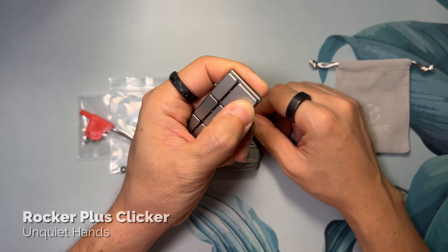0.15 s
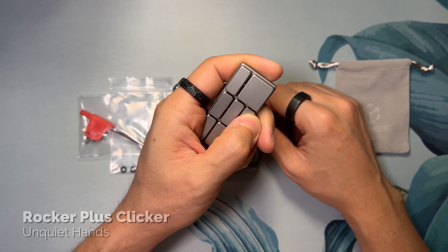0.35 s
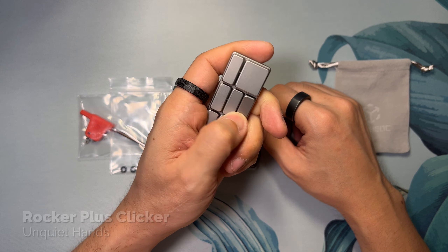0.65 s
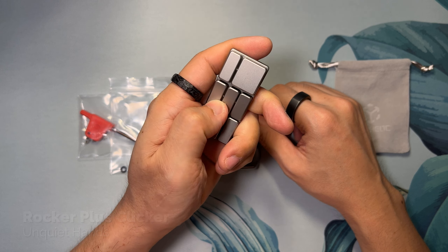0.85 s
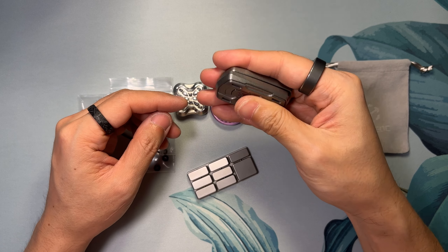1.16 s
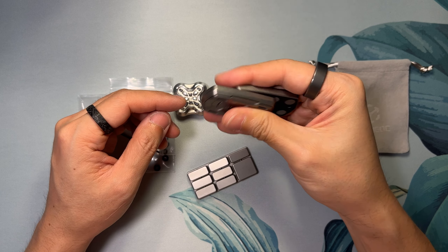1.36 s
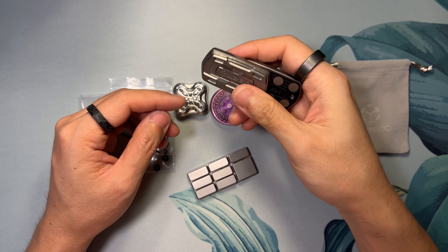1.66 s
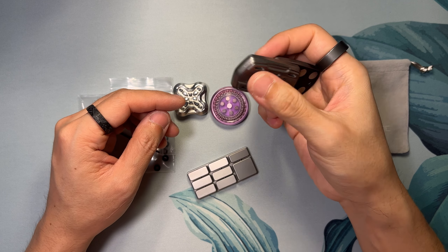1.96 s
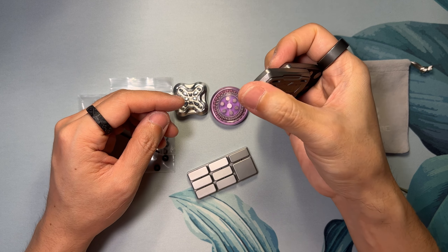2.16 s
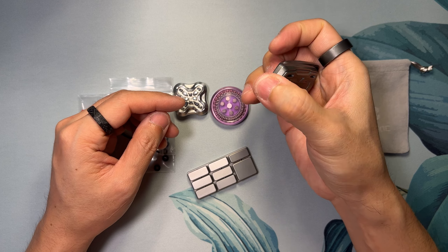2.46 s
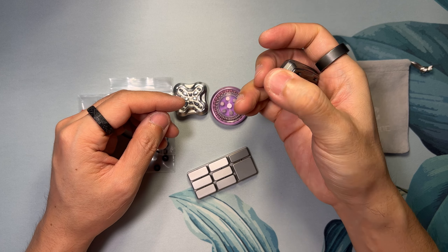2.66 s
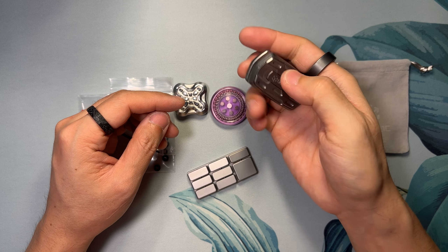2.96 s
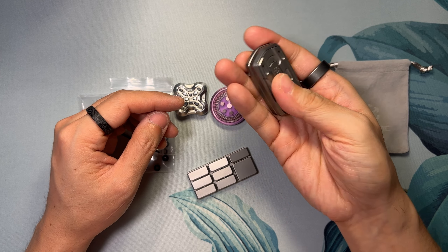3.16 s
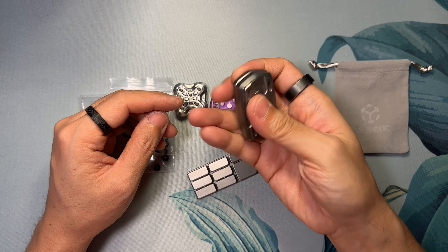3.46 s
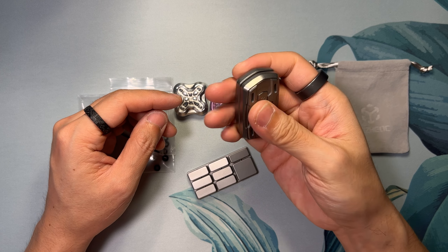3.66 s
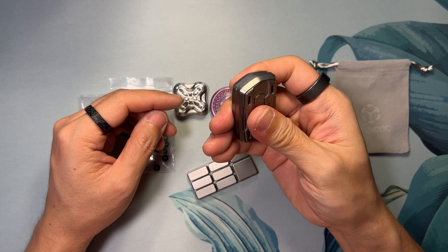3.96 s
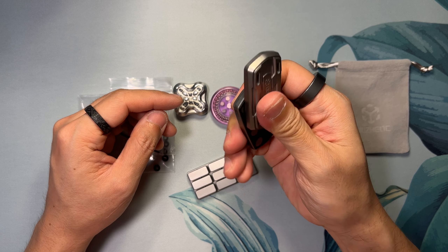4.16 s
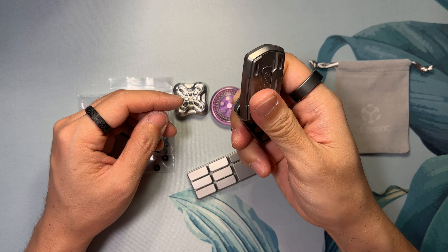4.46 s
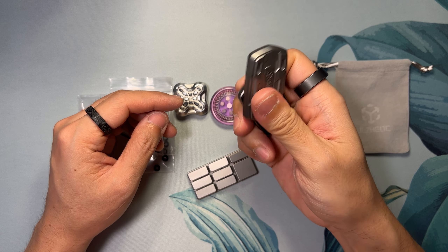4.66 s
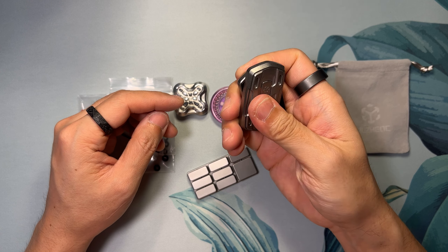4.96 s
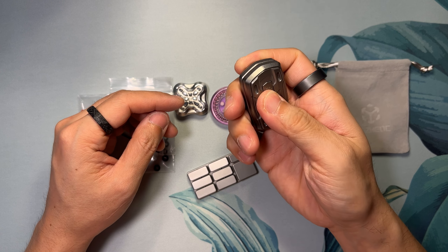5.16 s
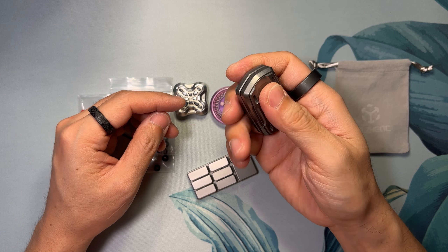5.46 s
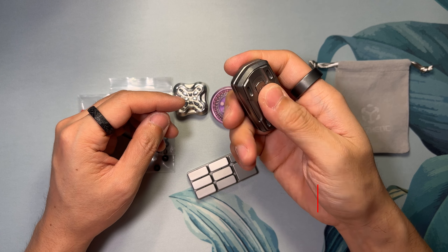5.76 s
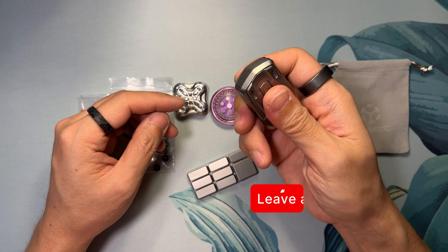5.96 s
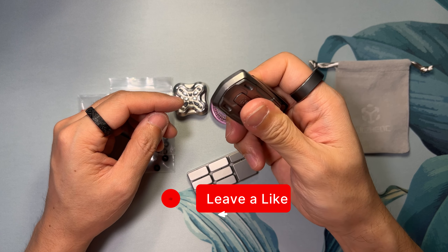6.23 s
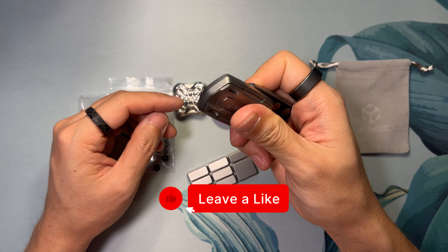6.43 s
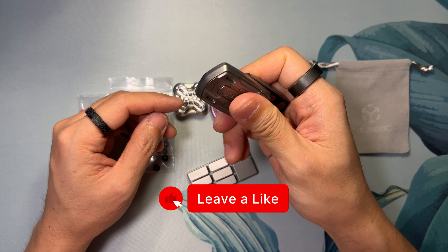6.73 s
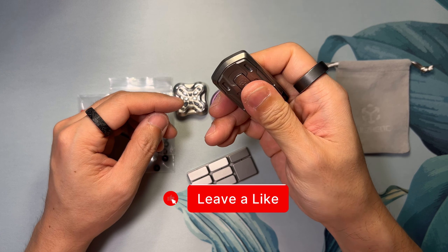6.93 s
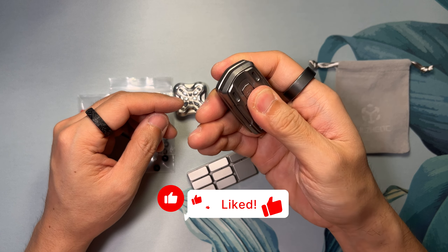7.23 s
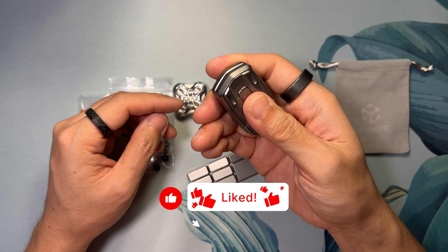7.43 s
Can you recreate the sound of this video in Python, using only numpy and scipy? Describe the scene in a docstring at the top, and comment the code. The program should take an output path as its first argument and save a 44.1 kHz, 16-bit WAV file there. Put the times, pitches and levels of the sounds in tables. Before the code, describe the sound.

Two hand-held metal fidget toys are worked over a desk, recorded very close. Three dry, piercing magnetic clicks open, evenly spaced. Then a rocker lever scrapes and snaps in uneven bursts, interrupted by a louder, fuller double clack of its folding arm. Later come a dense cluster of ticks and snaps, a quiet gap, and four spaced, loud snaps. Small-room reflections, thin metallic ring, soft skin rub and very faint deep hum.

```python
"""A small room, with two metal fidget toys clicked close to a microphone over a desk.
A magnetic slider slams from stop to stop; then a rocker's lever catches, scrapes and snaps home,
and once its folding arm clacks open and shut. Each blow is shaped noise sent through the metal's resonances.
The desk and walls throw each click back, and thin metal rings on as dying sines.
Behind them are skin rubbing on metal, air noise, wavering hum tones and a deep throb."""
import sys
import numpy as np
from scipy import signal
from scipy.fft import rfft, irfft
from scipy.io import wavfile
from scipy.ndimage import uniform_filter1d, minimum_filter1d

SR = 44100
rng = np.random.default_rng(int(sys.argv[2]) if len(sys.argv) > 2 else 0)


def wav_record(signal):
    """Record a signal, one row per channel, as 16-bit PCM in the file named by sys.argv[1]."""
    frames = np.transpose(np.atleast_2d(signal))
    bounded = np.clip(frames, -1, 1)
    # unit amplitude maps onto the largest positive 16-bit level
    quanta = np.round(bounded * 32767).astype(np.int16)
    wavfile.write(sys.argv[1], SR, quanta)


N = 334719  # length of the scene in samples
SIZE = 4096  # length of one blow and of its spectrum, in samples
HZ = np.fft.rfftfreq(SIZE, 1 / SR)

# shared by snaps and ticks: half width of the low knock, and scrape level against the peak of the snap
KNOCK_WIDTH_HZ, SCRAPE_DB = 280, -20


def rocker(start_s):
    """The lever snaps, ticks in its play and once slams into the frame; its spring pings."""
    # the lever snaps over; the row at 2.917 is the dull low knock of the arm settling:
    # (time [s], level [dB], chatter [s], scrape before the snap [s],
    # grip [0 loose to 1 tight], brightness [dB], low knock [Hz], low knock [dB])
    snaps = [(1.254, 10.5, .0065, .009, .1, 1, 1540, 7), (1.359, 12.5, .005, .012, .6, -1.5, 1780, 7.5),
             (2.917, -21, .004, .001, 0, -17, 2720, 24), (4.053, 13, .005, .0085, .1, .5, 1600, 7.5),
             (4.2967, 7, .0025, .004, .85, -8, 1950, 6), (4.652, 3.5, .003, .012, .7, -.5, 1600, 11),
             (4.793, -5, .0012, .007, .2, -1, 1400, 10), (6.054, 12.5, .0045, .0075, .1, .5, 2000, 8.5),
             (6.368, 10.5, .0045, .012, .1, .5, 2350, 6), (6.773, 12, .004, .006, .3, -2.5, 1750, 6),
             (7.0835, 16.5, .0045, .004, .15, -1.5, 2400, 4.5)]
    # once the lever slams right into the frame: one row with the same columns as the snaps
    slam = (5.0617, 13.5, .0021, .005, 0, -1, 2300, 8)
    # frame resonances that the slam wakes: (centre [Hz], half width [Hz], lift [dB])
    frame = [(2354, 200, 10.5), (4900, 650, 10)]
    # light ticks of the lever in its play:
    # (time [s], level [dB], chatter [s], grip [0-1], brightness [dB])
    ticks = [(.998, -26, .003, 0, -8), (1.508, -6.5, .002, .55, -11), (2.233, -21, .0055, .75, 2.5),
             (3.904, -14, .006, .3, 1), (4.118, -2, .004, .8, -1), (4.1353, 3, .0075, .8, -4),
             (4.215, -3, .0035, .3, -1.5), (4.279, -15.5, .0048, .3, 2), (4.917, -12.5, .003, .3, 0),
             (4.961, -.5, .003, .35, -5), (4.977, 1, .0015, 0, 5.5), (4.983, -6, .001, .2, 5),
             (5.043, 2.5, .0016, .15, 5), (6.998, -19, .007, .4, 2), (7.557, -33, .003, 0, -7)]
    # the spring pings as the lever is cocked: (pitch [Hz], level [dB], t60 [s])
    ping = (5699, -62, 0.49)
    ping_s = 3.906
    tick_travel_s = .003  # a tick has almost no travel
    tick_knock_hz, tick_knock_db = 2150, 4  # all ticks share one low knock

    out = np.zeros(N + SR)
    for row in snaps:
        s, sound = snap(*row)
        add(out, start_s + s, sound)

    frame_db = sum(bump(*mode) for mode in frame)
    s, sound = snap(*slam, frame_db)
    add(out, start_s + s, sound)

    for s, db, chatter_s, grip, bright_db in ticks:
        level_db = db + bump(tick_knock_hz, KNOCK_WIDTH_HZ, tick_knock_db)
        colour = held(grip, bright_db) * gain_of(level_db)
        tick = strike(catch(chatter_s, tick_travel_s, SCRAPE_DB), colour)
        add(out, start_s + s - tick_travel_s, room(tick, wet_db=0.8))
        add(out, start_s + s, ring(colour))

    add(out, start_s + ping_s, tone(*ping))
    return out


def snap(s, db, chatter_s, travel_s, grip, bright_db, knock_hz, knock_db, frame_db=0):
    """A soft swelling rustle leads into the scrape and the snap; returns start time and sound."""
    # rustle and scrape together take about the same time; what the travel leaves of it is a quiet swell
    lead_s, shortest_rustle_s = .012, .001
    rustle_s = max(lead_s - travel_s, shortest_rustle_s)

    # the low knock is one resonance of the struck spot
    level_db = db + bump(knock_hz, KNOCK_WIDTH_HZ, knock_db) + frame_db
    colour = held(grip, bright_db) * gain_of(level_db)

    rustle = catch(chatter_s=.0013, scrape_s=rustle_s, scrape_db=-50, swell_s=.25 * rustle_s)
    force = gain_of(-10.5) * rustle  # level against the snap
    add(force, rustle_s, catch(chatter_s, travel_s, SCRAPE_DB))

    out = np.zeros(SR)
    add(out, 0, room(strike(force, colour), wet_db=1.0))
    add(out, rustle_s + travel_s, ring(colour))
    return s - travel_s - rustle_s, out


def held(grip, bright_db):
    """Gain of the shell in the hand: a tight grip damps its low resonances and leaves the lever singing."""
    # the rocker's shell, damped by the hand: (centre [Hz], half width [Hz], level [dB])
    shell = [(1577, 350, -5.5), (1905, 359.0, -6.0), (2440, 354.0, -12.5), (3030, 400, -9.0),
             (4260, 570, -11), (5360, 370, -11), (5800, 566.0, -8), (7091.0, 642.0, 1.5), (8040, 940, 0.5),
             (8983, 640, 1.0), (10340, 610, -4), (11526.0, 570, -10.5), (13770, 994.0, 0.5),
             (15200, 760, -1.5)]
    # the fingers damp the shell below the lever's own pitch, held loosely and tightly:
    # (frequency [Hz], gain [dB])
    loose = [(1100, 1.5), (1700, -2), (3500, 2), (5250, 3), (8100, 0)]
    tight = [(1700, -12), (3500, -5), (5250, -1), (8100, 0)]

    damping = (1 - grip) * read(loose, HZ) + grip * read(tight, HZ)
    # a harder contact lifts the treble
    treble = np.interp(HZ, [8130, 12000], [0, bright_db])
    lever = bump(hz=8930, width_hz=380, db=grip ** 2 * 11)
    return body(shell, tick_db=-45, low_hz=695) * gain_of(damping + treble + lever)


def arm(start_s):
    """The rocker's folding arm hits its end stops and rings the whole toy."""
    # the arm swings out, then shuts, rebounds and settles: (time [s], level [dB], chatter [s],
    # scrape before it [s], scrape level [dB], position [0 open or 1 shut])
    swings = [(2.3582, 22.5, 0.0086, 0.01, -29.5, 0), (2.665, 19, 0.0017, 0.0055, -23, 1),
              (2.6805, 14.5, 0.016, .002, -9.5, 1), (2.917, -19, .004, .001, -20, 1)]
    # the rocker's resonances with the arm open and shut: (centre [Hz], half width [Hz], level [dB])
    arm_open = [(1550, 150, 1.5), (2100, 400, -5), (3300, 500, -2.5), (4340, 450, -2), (5220, 400, -1),
                (6150, 400, -4), (7050, 400, 1), (8500, 450, 2.5), (10300, 900, -12), (13200, 300, -6),
                (14200, 500, -5.5), (15300, 400, -10)]
    arm_shut = [(1650, 300, -1.5), (2200, 310, -3), (3270, 300, 4.5), (4500, 350, 2), (5680, 600, 0),
                (7030, 240, 4.5), (7696, 300, 3.5), (8530, 540, -5), (11000, 1200, -11),
                (14000, 1200, -5.5)]

    out = np.zeros(N + SR)
    for s, db, chatter_s, scrape_s, scrape_db, shut in swings:
        modes = arm_shut if shut > .5 else arm_open
        colour = gain_of(db) * body(modes, tick_db=-30, low_hz=600)
        clack = strike(catch(chatter_s, scrape_s, scrape_db), colour)
        add(out, start_s + s - scrape_s, room(clack, wet_db=2.2))
        add(out, start_s + s, ring(colour))
    return out


def slider(start_s):
    """Magnets pull the plates into a stop, where they chatter for a millisecond or two."""
    # slider clicks: (time [s], level [dB], chatter [s], stop that the plates land in [0-2])
    slides = [(-.062, 19, 0.0015, 0), (.556, 21, 0.0007, 0), (0.6556, 20, 0.0014, 1),
              (.753, 25.5, 0.0027, 2)]
    # the plates overlap differently in each stop, so each has its own resonances:
    # (centre [Hz], half width [Hz], level [dB])
    first_stop = [(3020, 420, -12.5), (4680, 830, -11.5), (6380, 430, -3.5), (8520, 643.0, 1),
                  (9904.0, 452.0, -2), (10965.0, 340, -4.5), (13570, 780, -2), (15300, 557.0, -13)]
    second_stop = [(3530, 390, -8.5), (5702.0, 622.0, -12), (7548.0, 360, -3), (9300, 382.0, 1.5),
                   (11000, 360, -1.5), (13100, 285.0, -4.5), (14570, 533.0, -7.5), (15544.0, 340.0, -10.0)]
    third_stop = [(3280, 350, -15), (5200, 150, -8), (6200, 380, -12), (8320, 590, -5), (10520, 340, -8),
                  (12180.0, 1500, -14.5), (14100, 350, -8.5), (15130, 716.0, -11.5)]

    out, t = np.zeros(N + SR), np.arange(SIZE) / SR
    for s, db, chatter_s, stop in slides:
        modes = (first_stop, second_stop, third_stop)[int(stop)]
        main_burst = np.exp(-(t / chatter_s) ** 2)
        faint_tail = 0.081 * np.exp(-t / 0.0048)
        force = chatter(main_burst + faint_tail)
        click = gain_of(db) * strike(force, body(modes, tick_db=-34.5, low_hz=904))
        add(out, start_s + s, room(click, wet_db=0))
    return out


def catch(chatter_s, scrape_s, scrape_db, swell_s=.0011):
    """Force of metal that scrapes, swells into a snap and chatters to rest."""
    after = np.arange(SIZE) / SR - scrape_s  # time since the snap
    scrape = np.maximum(gain_of(scrape_db), np.exp(-abs(after) / swell_s))
    rest = np.exp(-(abs(after) / chatter_s) ** 2.4)
    return chatter(np.where(after < 0, scrape, rest))


def chatter(envelope):
    """A rush of tiny metal contacts under an envelope, with energy 1 spread evenly over all pitches."""
    force = rng.standard_normal(SIZE) * envelope
    for _ in range(2):
        z = rfft(force)
        local_power = uniform_filter1d(abs(z) ** 2, size=37)
        force = irfft(z / np.sqrt(local_power + 1e-12))
        # flattening smears the burst, so mute it where the envelope is all but silent
        force = force * np.minimum(100 * envelope, 1)
    return force / np.linalg.norm(force)


def strike(force, gain):
    """Passes a force through the causal minimum-phase filter that has this gain."""
    log_gain = np.log(np.maximum(gain, gain.max() * 1e-4))
    circle = np.r_[log_gain, log_gain[-2:0:-1]]  # positive, then negative frequencies
    spectrum = np.exp(np.conj(signal.hilbert(circle)))  # the log gain sets the phase
    response = np.fft.ifft(spectrum).real[:SIZE // 2]
    return signal.fftconvolve(force, response)


def body(modes, tick_db, low_hz):
    """Gain of broad resonances over a bare tick; a small body radiates little bass."""
    power = sum(gain_of(db) ** 2 / (1 + ((HZ - hz) / width) ** 2) ** 2 for hz, width, db in modes)
    bass_loss = HZ ** 2 / (HZ ** 2 + low_hz ** 2)
    return np.sqrt(power + gain_of(tick_db) ** 2) * bass_loss


def bump(hz, width_hz, db):
    """One resonance as a lift in dB."""
    return db / (1 + ((HZ - hz) / width_hz) ** 2)


def ring(colour):
    """Each free part rings as strongly as the blow is loud at its pitch."""
    # the rocker's free metal parts ring longer: (pitch [Hz], level against the blow [dB], t60 [s])
    parts = [(1514, -63, .1), (2250, -67.5, .25), (3310, -61, .35), (3457, -57, .5), (3504, -57, 0.61),
             (4350, -70.5, .45), (5701, -78, 0.86), (7100, -72, 0.56), (8300, -59.5, .2), (8629, -72.5, .8),
             (9179, -66, .2)]
    return sum(np.interp(hz, HZ, colour) * tone(hz, db, t60) for hz, db, t60 in parts)


def tone(hz, db, t60):
    """One dying mode: a sine that falls 60 dB in t60 seconds."""
    t = np.arange(SR) / SR
    return gain_of(db - 60 * t / t60) * np.sin(2 * np.pi * hz * t)


def room(x, wet_db):
    """Direct sound, near echoes and a dense tail; the hand moves, so every click finds new paths."""
    # early echoes from desk, hands and gear: (nominal delay [s], level [dB])
    echoes = [(.0021, -13), (.0064, -13.5), (.0076, -14.5), (0.0143, -20.5), (0.0152, -20), (.0192, -22),
              (.029, -20)]
    # colour of the tail before the wet level: (frequency [Hz], level [dB])
    tail = [(700, -7), (1500, -13), (2200, -0.5), (4000, -2), (8000, -1.5), (15000, -4)]
    # decay of the tail: (frequency [Hz], t60 [s])
    tail_t60 = [(700, 0.19), (2500, 0.28), (5000, .29), (8000, .28), (11000, 0.27), (15000, .21)]

    t = np.arange(SR // 3) / SR
    hz, when, z = signal.stft(rng.standard_normal(len(t)), SR, nperseg=256)
    t60 = read(tail_t60, hz)[:, None]
    energy_one = np.sqrt(2 * np.log(1000) / (t60 * SR))  # a longer decay carries no more energy
    tail_db = wet_db + read(tail, hz)[:, None] - 60 * when / t60
    z = z * energy_one * gain_of(tail_db)
    build_up = 1 - np.exp(-t / 0.0024)
    response = signal.istft(z, SR, nperseg=256)[1][:len(t)] * build_up
    response[0] = 1  # direct sound
    for delay_s, db in echoes:
        add(response, delay_s * rng.uniform(0.91, 1.04), gain_of([db]))
    return signal.fftconvolve(x, response)


def fingers(centre_hz=6800, width_hz=2600):
    """A soft grainy hiss of skin sliding on metal, once, as the grip shifts."""
    # course of the rub: (start [s], rise [s], hold [s], fall [s])
    rub = (2.85, .45, .08, .25)
    rub_db = -73.5
    grain_db = 2.5 * noise(lambda f: 1 / (1 + (f / 60) ** 2))  # slow random level
    band = noise(lambda f: 1 / (1 + ((f - centre_hz) / width_hz) ** 2))
    hiss = evened(gain_of(grain_db) * band)
    return hiss * gain_of(rub_db) * swell(np.arange(N) / SR, *rub)


def background():
    """Filtered noise for room air, narrow noise bands for wavering hum, and a swelling sine for the throb."""
    # colour of the still air: (frequency [Hz], relative density [dB per Hz])
    air_colour = [(25, -23), (45, -0.5), (65, 4), (100, 0), (250, -1.5), (400, -6), (630, -9),
                  (1000, -13.5), (1600, -17.5), (2400, -19), (3200, -25), (9500, -28.5), (12000, -34.5),
                  (16000, -38)]
    # steady hum tones: (pitch [Hz], level [dB])
    hum_tones = [(59, -66), (150.7, -64), (199.2, -63.5), (269.2, -69), (320, -69.5), (468.3, -69),
                 (958.2, -78.5), (2293, -81)]
    # a faint deep throb that keeps coming back: (start in its cycle [s], rise [s], hold [s], fall [s])
    throb_course = (.19, .18, .45, .09)
    air_db, throb_db = -56, -50.5
    throb_hz, throb_every_s = 31.2, 2.68

    air = gain_of(air_db) * noise(lambda f: gain_of(read(air_colour, f)))

    hum = np.zeros(N)
    for hz, db in hum_tones:
        hum += gain_of(db) * noise(lambda f: 1 / (1 + ((f - hz) / 4.1) ** 2))

    cycle = np.arange(N) / SR % throb_every_s
    deep_tone = evened(np.sin(2 * np.pi * throb_hz * cycle))
    throb = gain_of(throb_db) * swell(cycle, *throb_course) * deep_tone
    return air + hum + throb


def noise(shape):
    """Steady noise of rms 1 whose amplitude spectrum is shape(Hz)."""
    spectrum = rfft(rng.standard_normal(N)) * shape(np.fft.rfftfreq(N, 1 / SR))
    return evened(irfft(spectrum, N))


def swell(t, start_s, rise_s, hold_s, fall_s):
    """Rises from silence to 1, holds, and falls back."""
    return np.interp(t, np.cumsum([start_s, rise_s, hold_s, fall_s]), [0, 1, 1, 0])


def gain_of(db):
    """Decibels to amplitude."""
    return 10 ** (np.asarray(db) / 20)


def evened(x):
    """Scales to rms 1."""
    return x / np.sqrt(np.mean(x ** 2) + 1e-20)


def read(points, hz):
    """Reads a table on a log-frequency axis."""
    f, value = np.transpose(points)
    return np.interp(np.log(hz + 1), np.log(f + 1), value)


def add(mix, s, sound):
    """Mixes a sound in at time s, in place."""
    part = mix[max(round(s * SR), 0):][:len(sound)]
    part += sound[:len(part)]


def scene():
    """Both toys in the room, over its background."""
    start_s = .5  # lead-in, cut off again, for sounds that begin before time 0
    toys = rocker(start_s) + arm(start_s) + slider(start_s)
    toys = toys[round(start_s * SR):][:N]
    return (toys + fingers() + background())[None]


def record(dry):
    """A fast limiter holds the loudest peaks at full scale; then a low-pass limits the band."""
    needed_gain = 1 / np.maximum(abs(dry), 1)
    gain = uniform_filter1d(minimum_filter1d(needed_gain, size=45), size=45)
    low_pass = signal.firwin(511, 16000, window=("kaiser", 9), fs=SR)
    return signal.oaconvolve(dry * gain, low_pass[None], "same")


dry = scene()
out = record(dry)
wav_record(out)
```